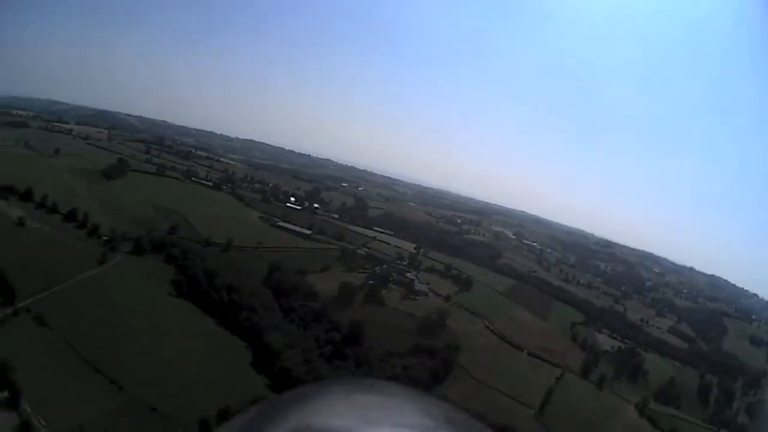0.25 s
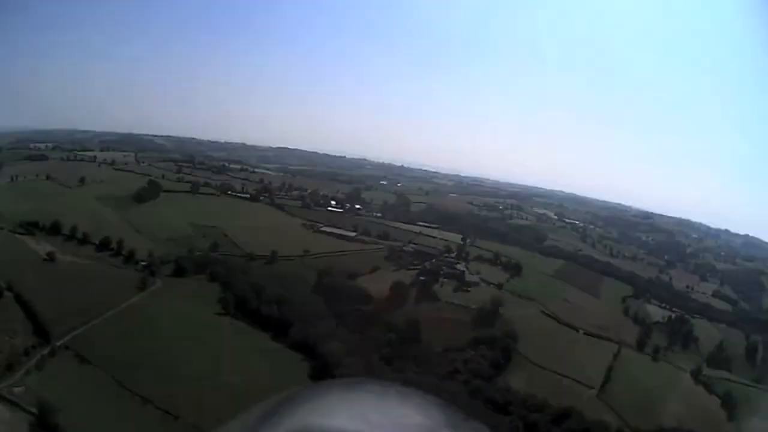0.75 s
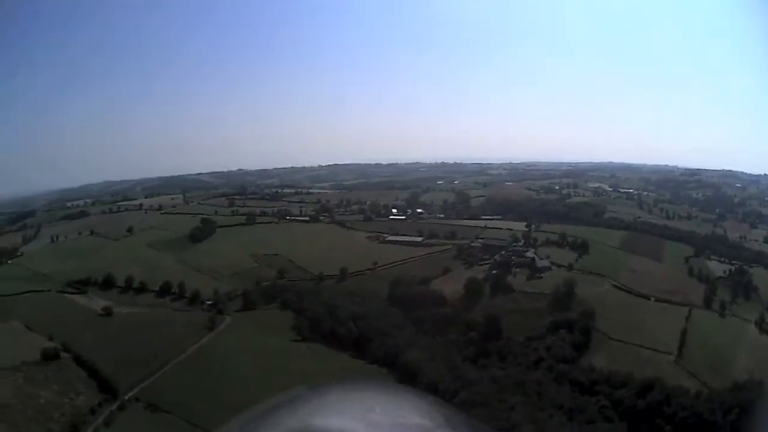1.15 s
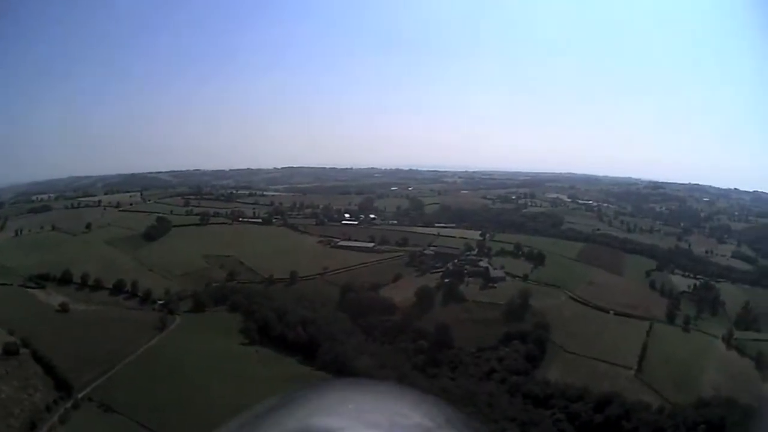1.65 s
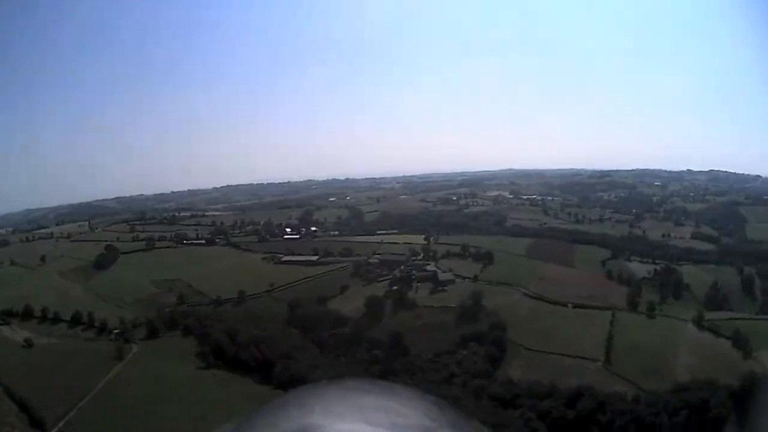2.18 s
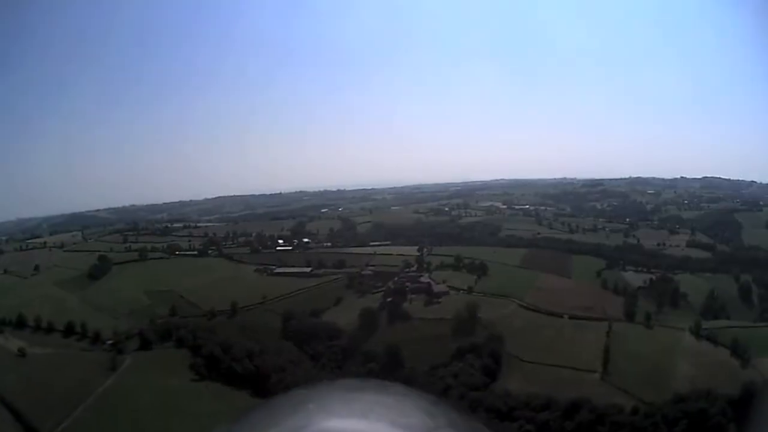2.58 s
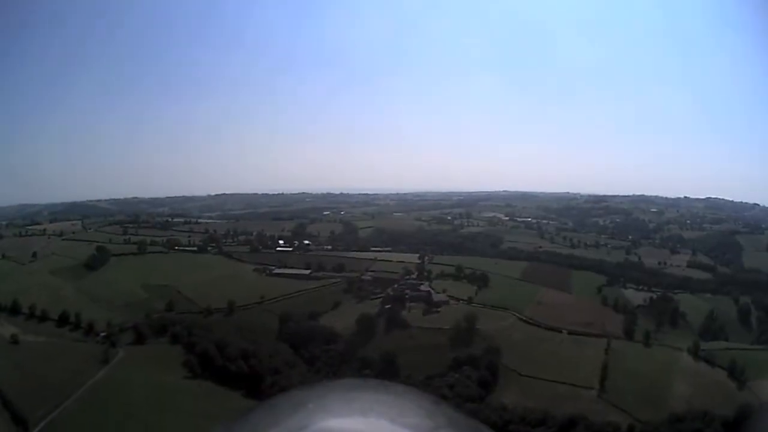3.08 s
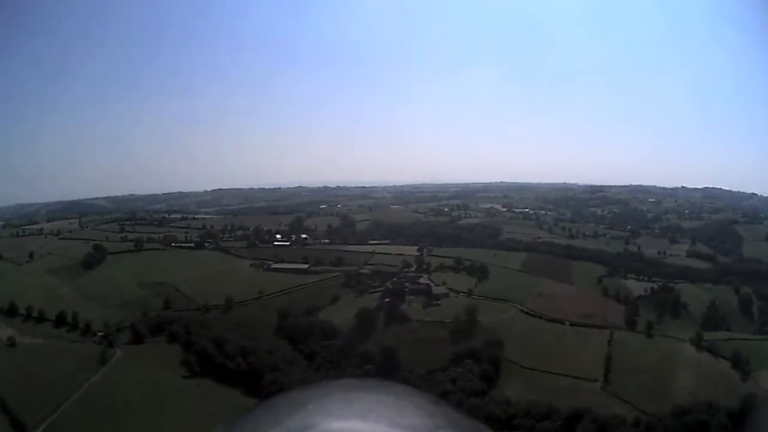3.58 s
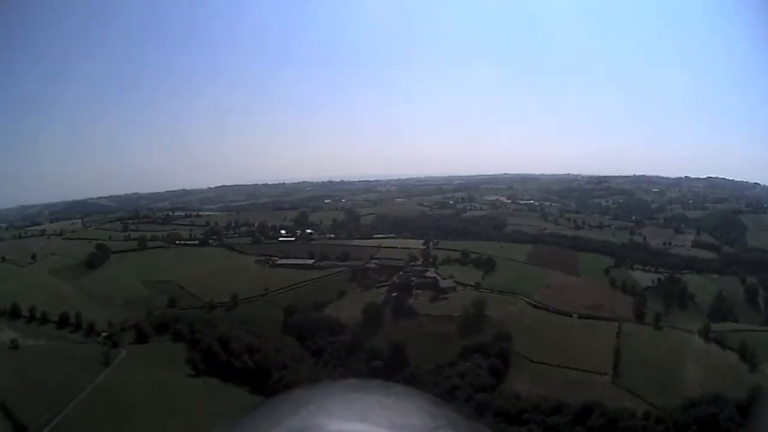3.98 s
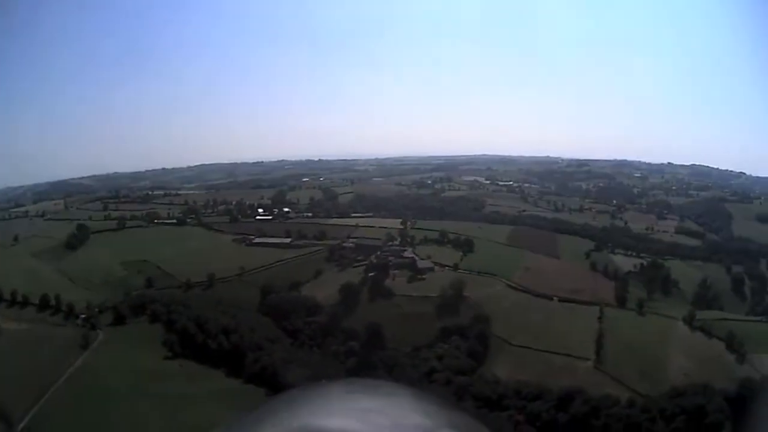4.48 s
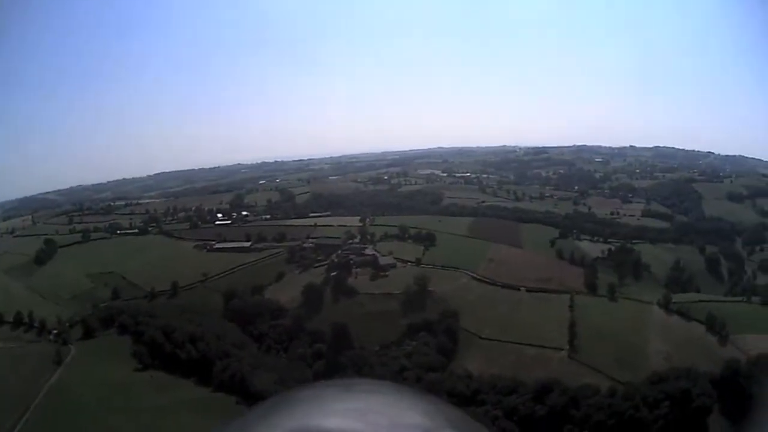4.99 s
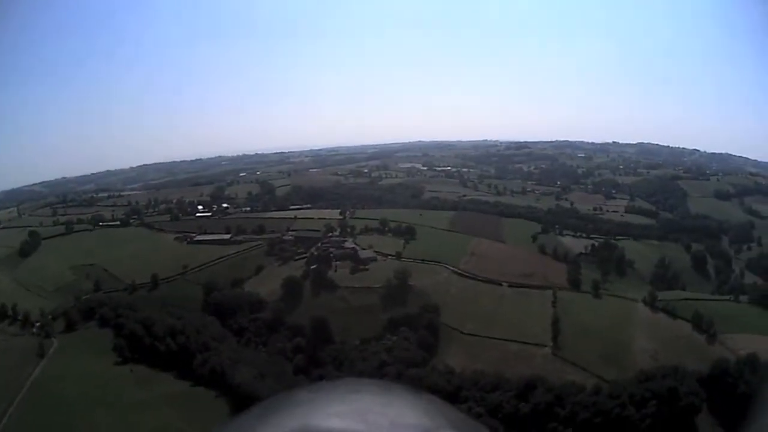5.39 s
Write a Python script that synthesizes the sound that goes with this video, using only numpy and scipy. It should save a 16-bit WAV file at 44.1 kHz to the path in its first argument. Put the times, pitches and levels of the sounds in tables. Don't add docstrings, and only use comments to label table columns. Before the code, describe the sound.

Extremely close wind noise on an exposed onboard microphone: low, rolling turbulence with a dull rush above it and very faint hiss. Around 1.2 seconds a single gust brings heavy thumps, ragged tearing air and clustered clipped cracks. It falls back by about 1.6 seconds to uneven steady rumble, a short knock at 2.75, then gentle swells to the end. No motor is heard.

```python
import sys
import numpy as np
from scipy import signal
from scipy.fft import rfft, irfft
from scipy.io import wavfile
from scipy.ndimage import uniform_filter1d

SR = 44100
rng = np.random.default_rng(int(sys.argv[2]) if len(sys.argv) > 2 else 0)


def volts_from_decibels(level):
    exponent = np.asarray(level, float) / 20
    return 10 ** exponent


def dump(signal):
    limited = np.clip(np.atleast_2d(signal).T, -1, 1)
    pcm = np.round(limited * 32767).astype(np.int16)
    wavfile.write(sys.argv[1], SR, pcm)


N = 249152

# time_s, eddy_level_db
AIRFLOW = [(0, -17.5), (.45, -15.5), (.95, -14), (1.07, -11.5), (1.3, -11), (1.55, -13.5), (2.1, -14.5),
           (2.37, -16), (2.55, -14), (3.049, -16), (3.45, -15), (3.8, -16.5), (4.1, -17.5), (4.5, -15),
           (4.7, -17), (5.2, -16), (5.65, -16)]
# time_s, peak_full_scale
PRESSURE_JOLTS = [(1.0275, .72), (1.1267, .79), (1.1999, .72), (1.2053, .82), (1.21, 1.0), (1.2161, .74),
                  (1.2194, .82), (1.236, .87), (1.2444, .77), (1.2563, .75), (1.2728, .8), (1.2775, .76),
                  (1.2869, .77), (1.3, .87), (1.3084, .78), (1.3132, .78), (1.3247, .95), (1.3314, .85),
                  (1.3341, .85), (1.3424, .86), (1.3583, .96), (1.3673, .8), (1.3942, .92), (1.4472, .8),
                  (1.4678, .84), (1.4859, .84), (1.4924, .7), (2.7498, .7)]
# time_s, length_s, lower_ring_rise_db, upper_ring_rise_db
EDGE_WHISTLES = [
    (0.585, .04, 3, 9),
    (1.128, .015, 3, 5),
    (3.82, .035, 6, 4),
    (3.815, .01, 1, 11),
]
EDGE_TEARS = [1.197, 1.213, 1.242, 1.268, 1.302, 1.323, 1.361, 1.376, 1.385, 1.412, 1.43]
# centre_hz, width_hz, level_re_rush_db
HOUSING_CAVITIES = [(3900, 450, -24), (5780, 450, -37)]
# frequency_hz, density_db
EDDY_SPECTRUM = [(50, -22.5), (100, -2.5), (190, -0.5), (260, -1), (400, -5), (500, -7.5), (600, -12.5),
                 (700, -20.5), (800, -27.5), (900, -36.5), (1300, -64.5), (3000, -110)]
# frequency_hz, density_db
BUFFET_SPECTRUM = [(8, -16.5), (22, -1), (40, 3), (70, 5.5), (100, -8), (160, -34), (1000, -110)]
# frequency_hz, density_db
RUSH_SPECTRUM = [(300, -30.5), (700, -19), (1000, 0), (1600, 0.5), (2080, 2.5), (2300, -3.5), (2600, -15),
                 (3000, -22.5), (3400, -32), (5000, -48.5), (9000, -68)]
# frequency_hz, density_db
HISS_SPECTRUM = [(2000, 4), (7000, -1), (12000, -1), (13500, -1), (14500, -5), (15300, -5), (16000, -11.5)]

HISS_DB = -64.5
CRUISE_FLOW_DB = -16
RUSH_CRUISE_DB, RUSH_PER_FLOW_DB, RUSH_GUST_DB = -42.5, 0.7, 9
BUFFET_CRUISE_DB, BUFFET_PER_FLOW_DB, BUFFET_GUST_DB = -26.5, -0.47, 11.5
GUST_START_S, GUST_ATTACK_S, GUST_HOLD_S, GUST_RELEASE_S = 1.065, 0.16, 0.13, 0.19
BUFFET_LAG_S = 0.058
RAGGED_ONSET_DB = -36
TEAR_S, TEAR_DB = 0.004, 4.5
STIFFENS_AT_FS, OVERLOAD_FS = 0.58, 0.705
JOLT_S = 0.00076
PINNED_AT_S, PINNED_S, PINNED_FS = 1.3277, 0.0028, 0.74


def noise(spectrum):
    hz, db = np.transpose(spectrum)
    bins_hz = np.maximum(np.arange(N // 2 + 1) * SR / N, 1)
    gain = volts_from_decibels(np.interp(np.log(bins_hz), np.log(hz), db)) * (bins_hz < hz[-1])
    x = irfft(rfft(rng.standard_normal(N)) * gain, N)
    return x / np.std(x)


def ring(centre_hz, width_hz):
    bins_hz = np.arange(N // 2 + 1) * SR / N
    gain = 1 / (1 + ((bins_hz - centre_hz) / width_hz) ** 2)
    x = irfft(rfft(rng.standard_normal(N)) * gain, N)
    return x / np.std(x)


def walk(rate_hz):
    hold = int(SR / rate_hz)
    steps = np.repeat(rng.standard_normal(N // 40), hold)[:N]
    x = uniform_filter1d(uniform_filter1d(steps, hold), hold)
    return x / np.std(x)


def swell(time_s, length_s):
    return np.exp(-((np.arange(N) / SR - time_s) / length_s) ** 2)


def gust(lag_s):
    corners_s = lag_s + np.cumsum([GUST_START_S, GUST_ATTACK_S, GUST_HOLD_S, GUST_RELEASE_S])
    return np.interp(np.arange(N) / SR, corners_s, [0, 1, 1, 0])


def preamp_hiss():
    return volts_from_decibels(HISS_DB) * noise(HISS_SPECTRUM)


def housing_rush(rush_db):
    strength = np.clip((rush_db - RAGGED_ONSET_DB) / 12, 0, 1)
    tears_db = TEAR_DB * sum(swell(time_s, TEAR_S) for time_s in EDGE_TEARS)
    ragged_db = (0.8 + 2.4 * strength) * walk(160) + tears_db
    flow = noise(RUSH_SPECTRUM)
    for k, (centre_hz, width_hz, level_db) in enumerate(HOUSING_CAVITIES):
        whistle_db = sum(row[2 + k] * swell(row[0], row[1]) for row in EDGE_WHISTLES)
        ring_db = level_db - 0.5 + whistle_db + 0.82 * walk(34) - 6.0 * strength
        flow = flow + volts_from_decibels(ring_db) * ring(centre_hz, width_hz)
    return volts_from_decibels(rush_db + ragged_db) * flow


def diaphragm_rumble(eddy_db, buffet_db):
    eddies = volts_from_decibels(eddy_db + 0.5 * walk(25)) * noise(EDDY_SPECTRUM)
    x = eddies + volts_from_decibels(buffet_db) * noise(BUFFET_SPECTRUM)
    x = x / (1 + (x / STIFFENS_AT_FS) ** 6) ** (1 / 6)
    x += swell(PINNED_AT_S, PINNED_S) * (PINNED_FS - x)
    for time_s, peak in PRESSURE_JOLTS:
        drive = np.sign(x[int(time_s * SR)]) * peak * (peak / 0.69) ** 0.6
        x += swell(time_s, JOLT_S) * (drive - x)
    return x


def scene():
    flow_db = np.interp(np.arange(N) / SR, *np.transpose(AIRFLOW))
    over_cruise_db = flow_db - CRUISE_FLOW_DB
    rush_db = RUSH_CRUISE_DB + RUSH_PER_FLOW_DB * over_cruise_db + RUSH_GUST_DB * gust(0)
    buffet_db = BUFFET_CRUISE_DB + BUFFET_PER_FLOW_DB * over_cruise_db
    buffet_db = buffet_db + BUFFET_GUST_DB * gust(BUFFET_LAG_S)
    mix = preamp_hiss() + housing_rush(rush_db) + diaphragm_rumble(flow_db, buffet_db)
    return mix[None]


def band_limit(x):
    return signal.sosfilt(signal.butter(12, 15700, fs=SR, output="sos"), x)


def record(dry):
    clipped = np.clip(dry + 0.0035, -OVERLOAD_FS, OVERLOAD_FS)
    lowpass = signal.butter(6, 14600, fs=SR, output="sos")
    return band_limit(signal.sosfilt(lowpass, clipped))


dry = scene()
out = record(dry)
dump(out)
```